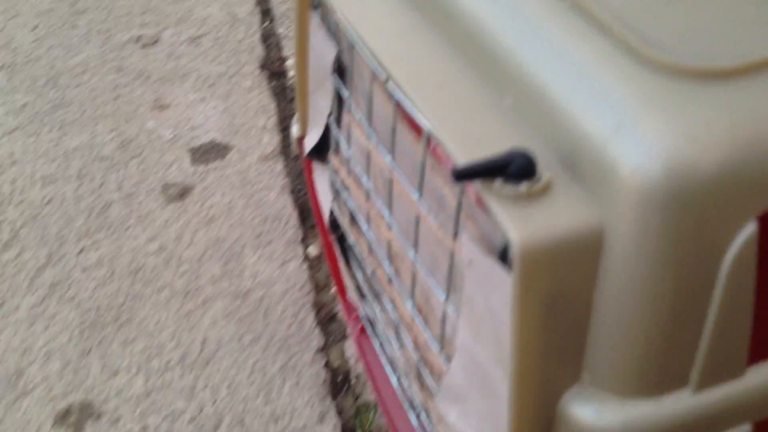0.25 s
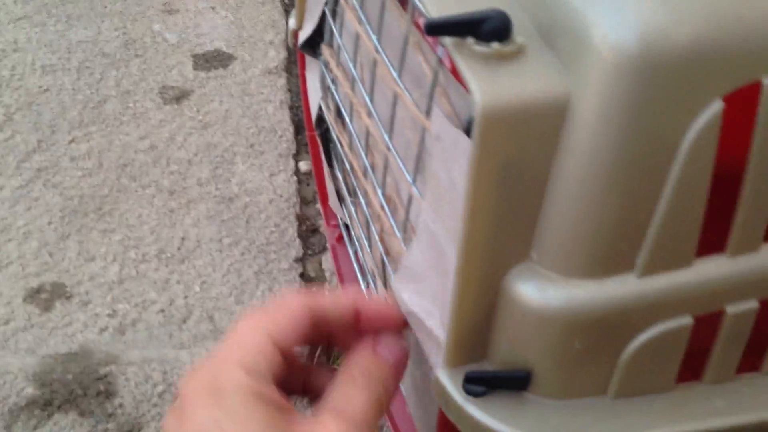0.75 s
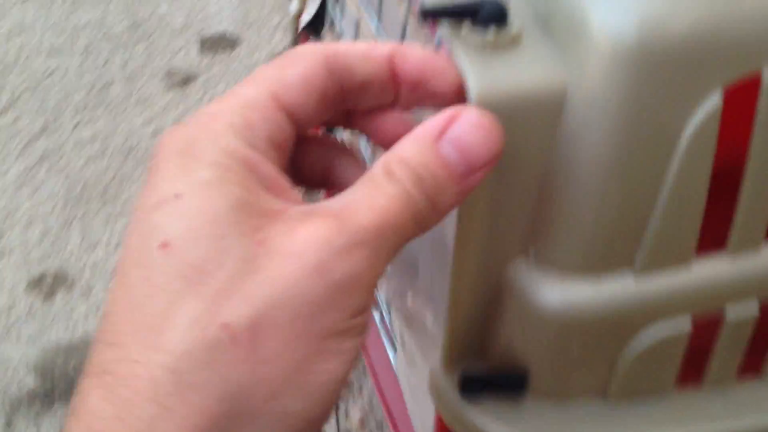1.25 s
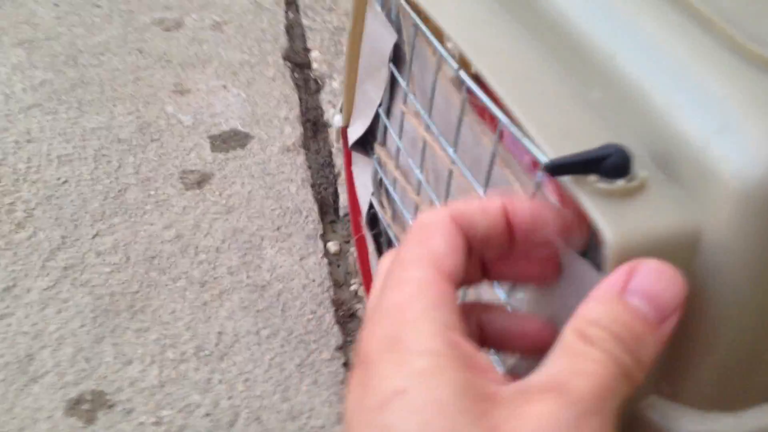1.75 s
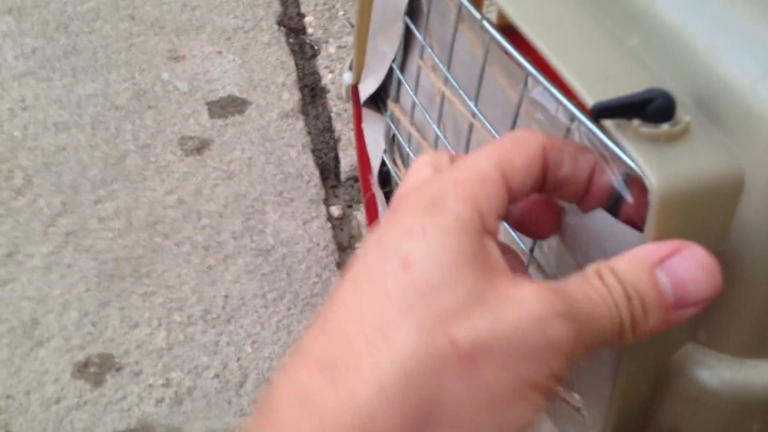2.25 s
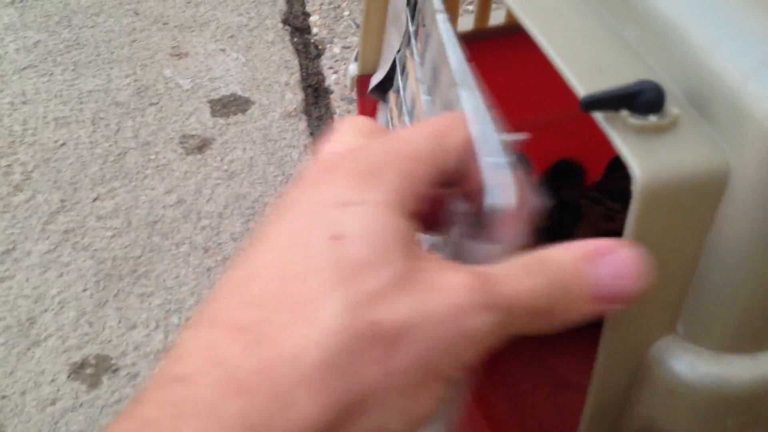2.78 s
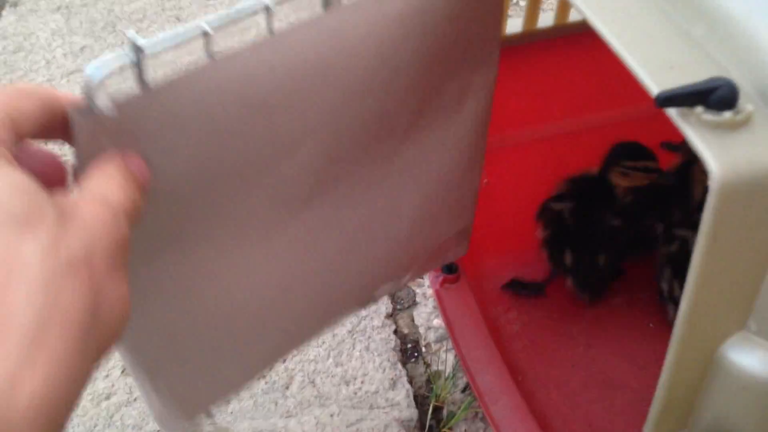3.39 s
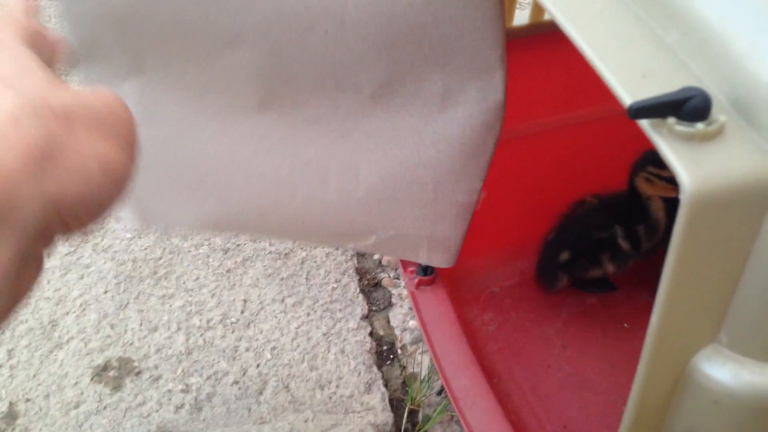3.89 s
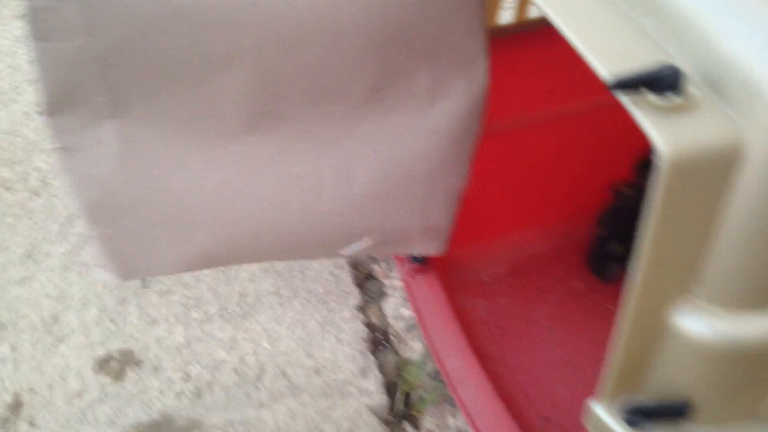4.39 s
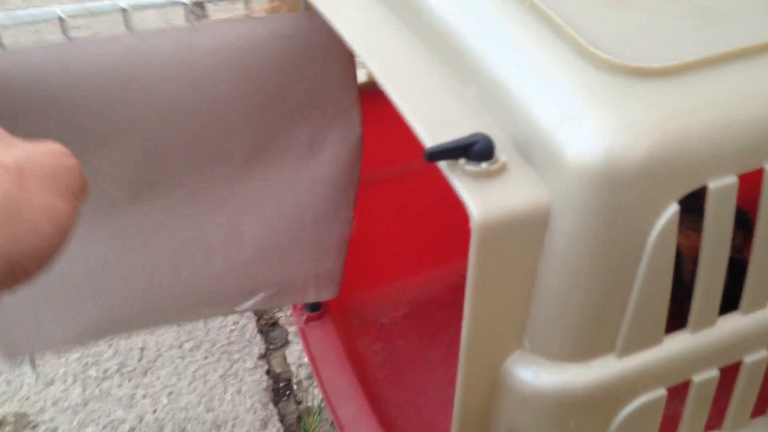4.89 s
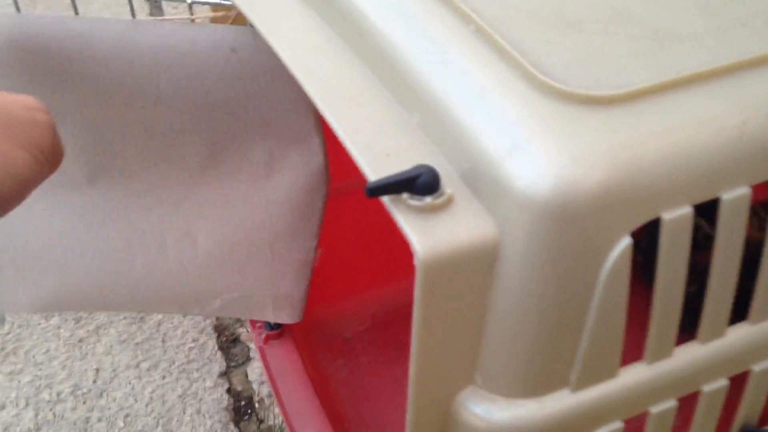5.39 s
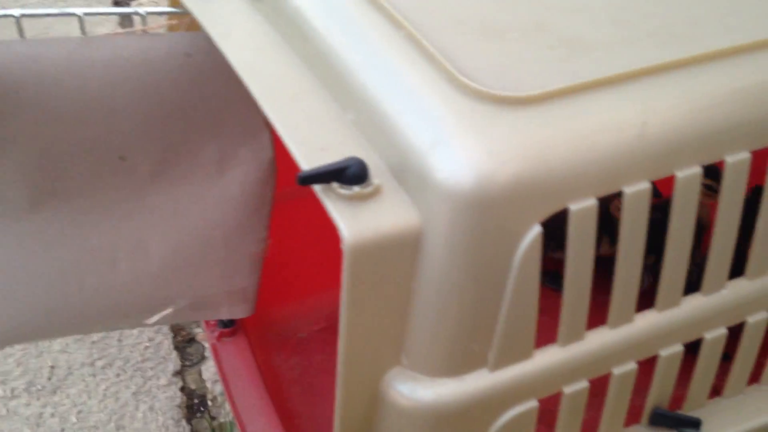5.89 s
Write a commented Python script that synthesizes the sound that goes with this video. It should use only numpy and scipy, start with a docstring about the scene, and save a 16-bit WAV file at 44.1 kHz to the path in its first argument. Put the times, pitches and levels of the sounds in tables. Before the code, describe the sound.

Ducklings give two faint peeps inside a plastic pet carrier outdoors. Close by, a hand works the wire door with rubs, sharp ticks and a knock or two. The door drags loose with a brief squeal, and the hollow shell cracks loudly twice. Then high peeps come thick and fast, mixed with soft low whistles and small knocks. A distant town rumbles steadily underneath.

```python
"""Ducklings peep in a plastic pet carrier outdoors, over the steady rumble of a distant town.
After two peeps and a knock, a hand works the wire door: it rubs and ticks while soft low whistles begin.
A little past two seconds the door drags loose with a squeal, and the hollow shell cracks and booms.
Then the peeps, whistled by each bird's voice box, come thick and fast, with small knocks as the
brood shuffles about. A faint far-off whine joins near the end."""
import sys
import numpy as np
from scipy import signal
from scipy.fft import rfft, irfft
from scipy.io import wavfile

SR = 44100
rng = np.random.default_rng(int(sys.argv[2]) if len(sys.argv) > 2 else 0)


def generate_wav(sig):
    """Save sig (samples, or channels by samples) to the path in sys.argv[1] as 16-bit PCM at SR."""
    pcm = np.round(np.clip(np.atleast_2d(sig).T, -1, 1) * 32767).astype(np.int16)
    wavfile.write(sys.argv[1], SR, pcm)


N = 270774


def amp(db):
    """Turns decibels (dB) into a number to multiply a sound by."""
    return 10 ** (np.asarray(db) / 20)


def unit(x):
    """Scales a signal to an average power of 1."""
    return x / np.sqrt(np.mean(x ** 2) + 1e-20)


def read(points, hz):
    """Looks up a value between the rows of a table of frequencies."""
    f, value = np.transpose(points)
    return np.interp(np.log(hz + 1), np.log(f), value)


def add(mix, start, sound):
    """Mixes a sound in at a start time in seconds."""
    part = mix[max(round(start * SR), 0):][:len(sound)]
    part += sound[:len(part)]


def colour(x, spectrum, tilt_db=0):
    """Shapes the tone of a sound; a tilt above 0 dB per octave makes it brighter."""
    hz = np.fft.rfftfreq(len(x), 1 / SR)
    gain = amp(read(spectrum, hz) + tilt_db * np.log2(np.maximum(hz, 700)))
    return irfft(rfft(x) * unit(gain), len(x))


def wander(n, hz):
    """A smooth random wobble that changes up to about hz times a second."""
    padded = n + SR // 10
    f = np.fft.rfftfreq(padded, 1 / SR)
    return unit(irfft(rfft(rng.standard_normal(padded)) / (1 + (f / hz) ** 4)))[:n]


def grit(n, spread_db, hz):
    """The noise of rubbing: tiny slips of uneven size."""
    return unit(rng.standard_normal(n) * amp(spread_db * np.clip(wander(n, hz), -2, 2)))


def ring(tones, t):
    """The dying tones of a struck object; each takes its fade time in seconds to fall 60 dB."""
    return sum(amp(db - 60 * t / fade) * np.sin(2 * np.pi * (hz * rng.uniform(1, 1.015) * t + rng.random()))
               for hz, db, fade in tones)


def outdoors():
    """A distant town rumbles, wavering and slowly fading, with a faint whine late on."""
    # The tone of the rumble. Each row: frequency in Hz, level in dB.
    rumble_tone = [(15, -58), (25, -49), (145, -0.5), (354, 0.5), (714, -12.5), (887, -12), (1020, -17),
                   (1560, -20), (1700, -21), (2350, -21.5), (4250, -30), (4740, -29.5), (9070, -37),
                   (14800, -37.5), (16000, -74.5)]
    t = np.arange(N) / SR
    level_db = -41.5 - .45 * t + .8 * wander(N, 14)
    out = amp(level_db) * colour(rng.standard_normal(N), rumble_tone)
    n = int(.58 * SR)
    whine_hz = 893 * (1 + .0059 * wander(n, 30))
    whine = np.sqrt(2) * np.sin(2 * np.pi * np.cumsum(whine_hz) / SR)
    add(out, start=5.52, sound=amp(-54) * whine * signal.windows.tukey(n, .6))
    return out


def syrinx(hz, second_db, second_ratio, octave_db, jitter, flutter_db, edge):
    """A bird's voice box: one side whistles an almost pure note, the other adds a hoarse second voice."""
    n = len(hz)
    phase = 2 * np.pi * np.cumsum(hz * (1 + jitter * wander(n, 350) + .006 * wander(n, 45))) / SR
    second_phase = 2 * np.pi * np.cumsum(hz * second_ratio * (1 + .028 * wander(n, 700))) / SR
    # a weak tone an octave up comes and goes, and is missing at the ends of the note
    octave = amp(octave_db + 2.5 * wander(n, 40)) * signal.windows.tukey(n, .6) * np.sin(2 * phase)
    rasp = amp(-5) * wander(n, 1300) * np.sin(.5 * (phase + second_phase))
    hiss = amp(-11) * wander(n, 2500) * np.sin(phase + second_phase)
    tone = np.sin(phase) + octave + amp(second_db) * (np.sin(second_phase) + rasp + hiss)
    flutter = amp(flutter_db * wander(n, 85))
    return np.sqrt(2) * tone * flutter * signal.windows.tukey(n, edge)


def low_whistles():
    """Soft husky notes well below the peeps: the pitch lifts, dips and lifts again."""
    # Each row: start and length in seconds, pitch of the dip in Hz, lift as a share of it, level in dB.
    whistles = [(1.249, 0.13, 1440, 0.2, -37.5), (1.503, 0.112, 1527, 0.14, -40),
                (1.876, 0.095, 1458, 0.086, -38), (2.149, 0.086, 1430, 0.057, -38),
                (3.389, 0.13, 1380, 0.086, -44), (3.631, 0.097, 1400, 0.16, -38.5),
                (3.895, .1, 1444, 0.053, -44), (5.022, 0.104, 1370, 0.088, -44),
                (5.268, 0.091, 1464, 0.15, -35), (5.543, 0.091, 1445, .1, -37.5),
                (5.861, 0.101, 1503, 0.109, -40)]
    out = np.zeros(N)
    for start, length, dip_hz, lift, db in whistles:
        place = np.linspace(-1, 1, int(length * SR))  # 0 is the middle of the note
        hz = dip_hz * (1 + lift * np.sin(np.pi * abs(place) ** 1.26) ** 2)
        voice = syrinx(hz, second_db=-11, second_ratio=1.14, octave_db=-30,
                       jitter=.026, flutter_db=2.6, edge=.3)
        level_db = db - 65 * np.log2(hz / dip_hz) + place ** 2  # quieter as the pitch lifts
        add(out, start, amp(level_db) * voice)
    return out


def door_rubs():
    """Fingers and wire slide over plastic and card in gritty strokes."""
    # Each row: start and length in seconds, level in dB, brightness in dB per octave.
    strokes = [(0.711, 0.032, -40.5, -6.5), (0.78, 0.059, -50, 2), (0.819, 0.18, -50.5, 2),
               (0.87, 0.073, -40, 3), (1.873, 0.13, -50, 5.5), (2.049, 0.075, -39.5, 1.5),
               (2.142, 0.087, -46.5, 5.5), (2.457, 0.034, -44.5, 6), (2.818, 0.26, -46, 2),
               (2.948, 0.53, -51.5, 6.5), (3.463, 0.098, -49.5, 8), (4.467, .12, -51, 4),
               (4.907, 0.08, -48.5, 2.5)]
    # The tone of a stroke. Each row: frequency in Hz, level in dB.
    rub_tone = [(300, -5), (1200, -13.5), (2400, -6), (3700, -4), (5500, -9), (8500, -16), (12000, -22),
                (15500, -26)]
    out = np.zeros(N)
    for start, length, db, tilt_db in strokes:
        n = int(length * SR)
        rub = colour(grit(n, spread_db=4, hz=327), rub_tone, tilt_db)
        add(out, start, amp(db) * rub * signal.windows.tukey(n, .7))
    return out


def rattles():
    """Lists faint, unevenly spaced ticks for the times when the door is handled."""
    # Each row: start and end in seconds, ticks per second, level in dB, brightness in dB per octave.
    handling = [(0.776, 1.1, 10, -32.5, -5.5), (1.62, 2.0, 12.6, -34, -6.5), (2.919, 3.32, 24, -32.5, 5),
                (5.079, 5.36, 12, -39, 2)]
    ticks = []
    for start, end, rate, db, tilt_db in handling:
        for moment in np.arange(start, end, 1 / rate):
            late, size, bright = rng.uniform(-1, 1, 3)
            ticks.append((moment + .5 * late / rate, db + 4.5 * size, tilt_db + 3 * bright))
    return ticks


def door_ticks():
    """The wire door ticks: each time a hard contact, then a short buzz."""
    # Each row: start in seconds, level in dB, brightness in dB per octave.
    clear_ticks = [(0.8883, -17, -4), (1.3423, -32, 13), (1.681, -26, -5.5), (1.7197, -31.5, -9),
                   (1.823, -31, -1), (2.0255, -24, -4), (2.261, -27.5, 0), (2.2848, -12.5, -3),
                   (2.2947, -18, 4), (2.3574, -23.5, -6.5), (2.4815, -26, -4), (2.8506, -16, -3),
                   (3.057, -28, -2), (3.259, -15, -1), (3.674, -25, -3.5), (5.5326, -27.5, -4.5)]
    # The tone of the wire. Each row: frequency in Hz, level in dB.
    wire_tone = [(300, -16.5), (1200, -6), (2500, -3.5), (4000, 5), (6500, 5), (9000, 2.5), (12000, -3.5),
                 (15500, -7.5)]
    out, t = np.zeros(N), np.arange(SR // 10) / SR
    contact, buzz = 2.2 * np.exp(-t / .0005), amp(-60 * t / .051)
    for start, db, tilt_db in clear_ticks + rattles():
        burst = np.pad((contact + buzz) * rng.standard_normal(len(t)), SR // 500)
        add(out, start - .0015, amp(db - 15) * colour(burst, wire_tone, tilt_db))
    return out


def door_drag():
    """Wire grinds along the plastic frame and squeals; both ease as the door comes free."""
    # The tone of the grinding. Each row: frequency in Hz, level in dB.
    grind_tone = [(100, -23), (300, -37), (850, 0), (1200, -2.5), (1600, 3), (2000, -5), (2400, 0),
                  (3100, 3), (4500, -7), (8000, -14.5), (15000, -25)]
    start, end, squeal_rise = 2.26, 2.505, .051  # seconds
    out, t = np.zeros(N), np.arange(0, end - start, 1 / SR)
    n = len(t)
    grind = amp(-36.5 - 62 * t) * colour(grit(n, spread_db=1, hz=250), grind_tone)
    flicker = np.sqrt(2) * wander(n, 105)
    squeal_hz = 1610 * (1 + .029 * wander(n, 77))
    squeal = flicker * np.sin(2 * np.pi * np.cumsum(squeal_hz) / SR)
    squeal_gain = amp(-36 - 55 * t) * np.minimum(t / squeal_rise, 1) ** 2
    add(out, start, (grind + squeal_gain * squeal) * signal.windows.tukey(n, .03))
    return out


def shell_knocks():
    """Each blow scrapes, cracks, rings the panels and booms in the hollow shell, which bounces once."""
    # Each row: time in seconds, crack and boom levels in dB, brightness in dB per octave, boom pitch in Hz.
    knocks = [(.299, -19, -19, -3, 330), (1.1272, -20, -32, -.5, 333), (2.2865, -32, -46, -6, 850),
              (2.5011, -12.5, -13.5, 0.5, 380), (2.8209, -12, -20, 1.5, 226),
              (2.935, -39, -25.5, -3.5, 200), (4.0185, -32.5, -33.5, -1.5, 197),
              (4.0985, -29.5, -25, -3.5, 234), (4.202, -35.5, -36, -5.5, 390),
              (4.623, -36.5, -36.5, -0.5, 300), (4.926, -36, -58, -0.5, 301), (5.017, -34, -48, -3, 300),
              (5.2618, -31.5, -28.5, -6.5, 232), (5.388, -38, -49, -6.5, 400), (5.7505, -44, -26, 1, 198.5)]
    # The tone of the plastic's crack. Each row: frequency in Hz, level in dB.
    crack_tone = [(40, -52), (120, -3), (400, -5.5), (800, 1), (1600, 5), (2400, 4), (3700, 4),
                  (5500, -1.5), (8000, -10.5), (15000, -24)]
    # How long the crack lasts. Each row: frequency in Hz, fade time in seconds.
    crack_fades = [(300, 0.28), (1000, 0.055), (3000, 0.042), (7000, 0.041), (15000, 0.072)]
    # The ringing of the panels. Each row: pitch in Hz, level in dB.
    panel_tones = [(560, -14), (850, 3.5), (1350, 3), (1600, 0), (1740, -11), (1880, 0.5), (2340, -21),
                   (2975, 0), (3330, 2.5), (4500, -5), (5200, -13)]
    # The low tones of the shell. Each row: pitch in Hz, level in dB, fade time in seconds.
    shell_tones = [(129.5, -19, 0.22), (170, -10, 0.13), (207.5, -1.5, 0.073), (253, -13.5, 0.19),
                   (324, -3.5, 0.066), (373, 1, 0.041), (533, -0.5, 0.045), (810, -10, 0.057)]
    # Heavier pushes scrape longer before they land. Each row: boom level in dB, swell time in seconds.
    scrape_times = [(-30, 0.0013), (-29, 0.0035)]
    out, t = np.zeros(N), np.arange(SR // 4) / SR
    bounce_s, bounce_db, panel_fade_s = .025, -15, .06
    crack_rise, boom_rise = 1 - np.exp(-(t / .0006) ** 2), 1 - np.exp(-(t / .0061) ** 2)
    bounces = [(start + bounce_s, boom_db + bounce_db, boom_db + bounce_db, tilt_db, boom_hz)
               for start, _, boom_db, tilt_db, boom_hz in knocks]
    for start, crack_db, boom_db, tilt_db, boom_hz in knocks + bounces:
        # split noise into frequency bands so that each dies away at its own speed
        noise = colour(grit(len(t), spread_db=2, hz=860), crack_tone, tilt_db)
        band_hz, age, bands = signal.stft(noise, SR, nperseg=128)
        fading = amp(-60 * age / read(crack_fades, band_hz)[:, None])
        crack = signal.istft(bands * fading, SR, nperseg=128)[1][:len(t)]
        panels = amp(-17.5) * ring([(hz, db, panel_fade_s) for hz, db in panel_tones], t)
        add(out, start, amp(crack_db) * (crack + panels) * crack_rise)
        # the hardest contact is one sharp snap
        snap = colour(signal.unit_impulse(len(t), "mid"), crack_tone, tilt_db)
        add(out, start - t[len(t) // 2], amp(crack_db + 10) * snap)
        # the scrape is a fading noise played backwards, so it swells into the blow
        swell_s = np.interp(boom_db, *np.transpose(scrape_times))
        before = t[:int(swell_s * 2 * SR) + 2]
        friction = colour(rng.standard_normal(len(t)), crack_tone, tilt_db) * crack_rise
        scrape = friction[:len(before)] * np.exp(-before / swell_s)
        add(out, start - before[-1], amp(crack_db - 3) * scrape[::-1])
        # tones near the boom pitch ring most: low for a slow push, higher for a quick one
        boom_tones = [(hz, db - 5 * np.log2(hz / boom_hz) ** 2, fade) for hz, db, fade in shell_tones]
        add(out, start, amp(boom_db + 6.5) * ring(boom_tones, t) * boom_rise)
    return out


def carrier(peeps):
    """Close walls echo the peeps, which swell and dip as they slide through the box's own pitches."""
    # Echoes off the walls. Each row: delay in seconds, level in dB.
    wall_echoes = [(.0011, -13), (.0023, -14), (.0037, -17)]
    # Pitches at which the air inside rings. Each row: pitch in Hz, width in Hz, level in dB.
    air_tones = [(3278, 23, -10.5), (3485, 20, -17), (3940, 21, -37), (4110, 78, 3)]
    t, fade_s = np.arange(SR // 10) / SR, .028
    tail = rng.standard_normal(len(t)) * amp(-60 * t / fade_s) * (t > .001)
    echo = amp(-10) * tail / np.linalg.norm(tail)
    echo[0] = 1  # the direct sound
    for delay, db in wall_echoes:
        add(echo, delay, amp([db]))
    ringing = sum(amp(db) * signal.lfilter(*signal.iirpeak(hz, hz / width, fs=SR), peeps)
                  for hz, width, db in air_tones)
    return signal.oaconvolve(peeps + ringing, echo)[:N]


def sliding_peeps():
    """Duckling peeps that start weak and hoarse, slide down, clear into full voice and then fade."""
    # Each row: start and length in seconds, high and low pitch in Hz, when the slide is lowest, level
    # in dB, when the voice is full, hoarseness in dB, last drop as a share of the pitch.
    # Each "when" is a share of the length; above 1, the note ends before it gets there.
    peeps = [(2.297, 0.064, 4480, 3580, 0.56, -25.5, 0.091, -14, 0.07),
             (2.548, .071, 4840, 3680, .72, -29, 0.45, -8.5, 0.01),
             (2.86, 0.054, 4580, 3590, 0.95, -33.5, 0.14, -18, 0),
             (3.709, 0.079, 3620, 2530, 1.31, -42, 0.11, -19, 0.05),
             (3.977, 0.098, 3890, 2530, 1.08, -40.5, 0.17, -12, 0.1),
             (4.231, 0.1, 3970, 3253, 0.64, -30.5, .4, -9, 0.34),
             (4.523, 0.095, 3630, 3110, 0.67, -32.5, 0.23, -18, 0.18),
             (4.805, 0.1, 3880, 2730, 1.4, -28.5, 0.25, -10.5, .04),
             (5.163, .094, 3880, 3146, .67, -27.5, 0.28, -13, 0),
             (5.414, .12, 4010, 3296, 0.55, -26.5, 0.4, -11, 0.39),
             (5.676, .11, 3930, 2990, 1.05, -29.5, 0.14, -5, 0.05),
             (5.778, 0.078, 3400, 2960, 0.9, -40, 0.27, -5.5, 0.2),
             (5.948, .112, 3790, 3187, 0.76, -29, 0.2, -1.5, 0.13),
             (6.053, 0.095, 4330, 2990, 0.9, -41.5, 0.23, 2, 0.1)]
    out = np.zeros(N)
    for start, length, high_hz, low_hz, low_at, db, full_at, hoarse_db, drop in peeps:
        progress = np.linspace(0, 1, int(length * SR))
        t = progress * length
        rebound = np.where(progress < low_at, 1, .5)  # the pitch climbs back half as steeply
        slide = (1 - np.sin(np.pi / 2 * progress / low_at)) * rebound
        scoop_up = 1 - .098 * np.exp(-t / .00376)
        last_drop = 1 - drop * np.exp((t - length) / .005)
        hz = (low_hz + (high_hz - low_hz) * slide) * scoop_up * last_drop
        hoarse = np.exp(-(progress / .3) ** 2)
        # a strong second voice is pulled closer in pitch to the first
        ratio = np.interp(hoarse_db, [-12, -6], [1.48, 1.24])
        voice = syrinx(hz, second_db=hoarse_db - 1.5 - 19 * (1 - hoarse), second_ratio=ratio,
                       octave_db=-31, jitter=.0029 + .04 * hoarse, flutter_db=1.7, edge=.09)
        since_full = t - full_at * length
        catch_db = -3 * np.exp(-t / .0096)  # the note takes a moment to catch
        opening_db = -10.5 * .5 * (1 - np.tanh(since_full / .0074))
        fade_db = -103 * np.maximum(since_full, 0)
        add(out, start, voice * amp(db + catch_db + opening_db + fade_db))
    return out


def arched_peeps():
    """Short duckling peeps that rise and fall, reediest at the top and a little louder on the way down."""
    # Each row: start and length in seconds, top pitch in Hz, level in dB, second voice in dB.
    peeps = [(0.009, 0.079, 3990, -42.5, -12), (0.176, 0.081, 4070, -40.5, -12),
             (3.409, 0.074, 3360, -49, -12), (3.729, 0.056, 4010, -44, -27),
             (3.907, 0.075, 3990, -41.5, -1), (4.145, 0.061, 3310, -53, -15),
             (4.448, 0.072, 4090, -43, -10), (4.621, 0.063, 4160, -42.5, -6),
             (5.549, 0.093, 4125, -40.5, -8.5), (5.71, 0.079, 4190, -39.5, -9)]
    out = np.zeros(N)
    for start, length, top_hz, db, second_db in peeps:
        place = np.linspace(-1, 1, int(length * SR))  # 0 is the top of the arch
        hz = top_hz * (1 - .5 * np.sin(place * 1.1) ** 2)
        voice = syrinx(hz, second_db - 4 * place ** 2, second_ratio=1.19, octave_db=-18,
                       jitter=.015, flutter_db=2.6, edge=.4)
        add(out, start, amp(db + 2 * place - 5.5 * place ** 2) * voice)
    return out


def scene():
    """Mixes the brood, the knocks, the door and the open air into one channel."""
    peeps = amp(-2.5) * (sliding_peeps() + arched_peeps())
    brood = carrier(peeps) + amp(-5.5) * low_whistles()
    return (brood + shell_knocks() + door_rubs() + door_ticks() + door_drag() + outdoors())[None]


def record(dry):
    """Cuts the highest treble, above 15600 Hz."""
    treble_cut = signal.firwin(301, 15600, window=("kaiser", 8), fs=SR)
    return signal.oaconvolve(dry, treble_cut[None], "same")


dry = scene()
out = record(dry)
generate_wav(out)
```